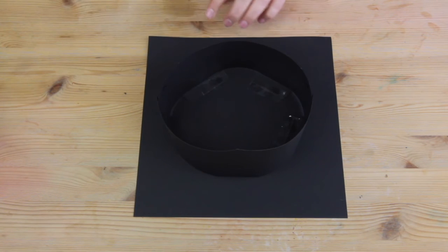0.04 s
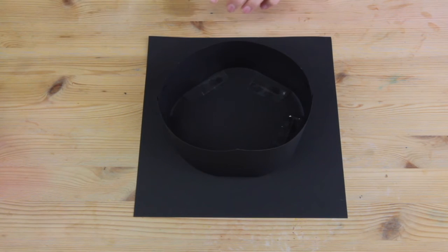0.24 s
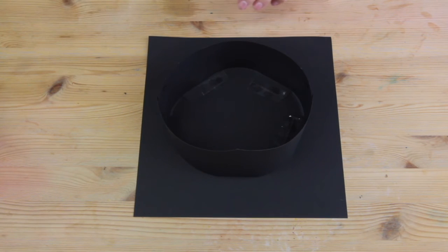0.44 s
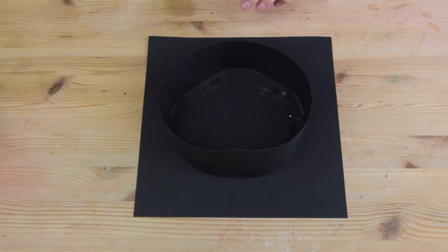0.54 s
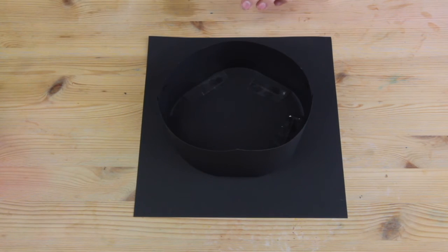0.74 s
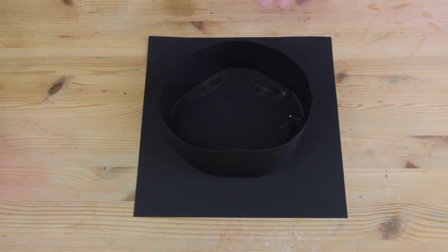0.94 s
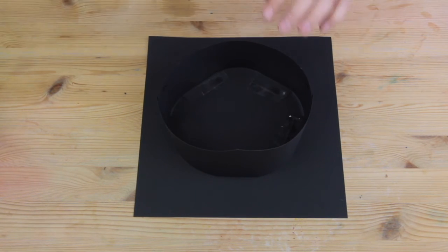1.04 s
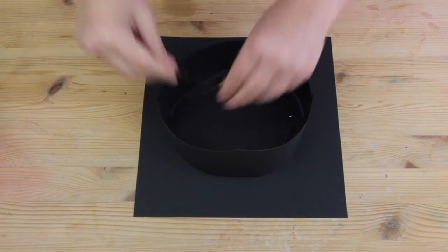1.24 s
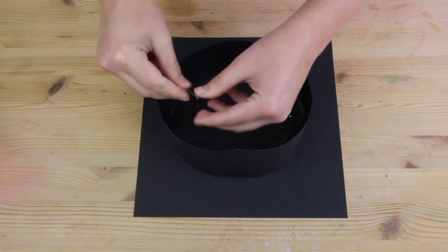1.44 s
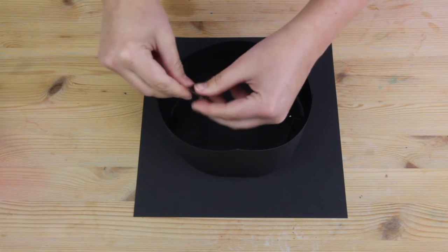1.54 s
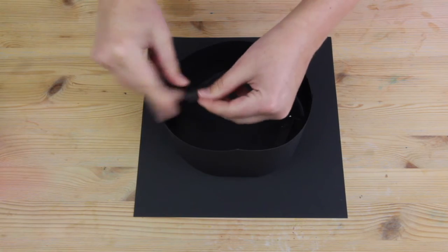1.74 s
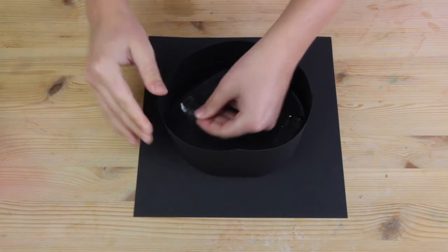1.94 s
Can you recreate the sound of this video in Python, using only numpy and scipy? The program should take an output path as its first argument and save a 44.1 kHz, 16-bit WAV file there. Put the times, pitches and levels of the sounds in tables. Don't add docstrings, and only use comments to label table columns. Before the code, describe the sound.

A quick crackly tearing of adhesive tape, two snaps, a faint rustle and a short pressing rasp

```python
import sys
import numpy as np
from scipy import signal
from scipy.fft import rfft, irfft, next_fast_len
from scipy.io import wavfile
from scipy.ndimage import map_coordinates

SR = 44100
rng = np.random.default_rng(int(sys.argv[2]) if len(sys.argv) > 2 else 0)


def boost_factor(decibels):
    exponent = np.asarray(decibels, float) / 20
    return 10 ** exponent


def unload_wav(signal):
    wavfile.write(
        sys.argv[1],
        SR,
        np.round(np.clip(np.atleast_2d(signal).T, -1, 1) * 32767).astype(np.int16),
    )


N = 88200

# start in seconds, level in dB, body knock over film crack in dB.
PEEL_START = [(0.2213, -16, -18), (0.2248, -28, -17), (0.2367, -14, -12), (0.2402, -26, -6),
              (0.2419, -11, -5), (0.2507, -23, -1), (0.2562, -18, -10), (0.2591, -18, -5),
              (0.2708, -29, -8), (0.3259, -13, -13), (0.3302, -17, -11), (0.3457, -15, -6),
              (0.349, -16, -6), (0.353, -15, -3), (0.3578, -17, -2), (0.3681, -17, -10), (0.376, -15, -2),
              (0.3805, -18, -12), (0.3844, -21, -4), (0.3946, -18, -8)]
PEEL_RUN = [(0.4085, -16, -4), (0.417, -17, -6), (0.4197, -19, -3), (0.4258, -18, -9), (0.4285, -19, -6),
            (0.4341, -18, -7), (0.4383, -20, -5), (0.4427, -21, -3), (0.447, -21, -5), (0.4534, -20, -2),
            (0.4599, -20, -4), (0.467, -17, -5), (0.4712, -19, -3), (0.4874, -15, -3), (0.4969, -21, -2),
            (0.4997, -22, -4), (0.5042, -29, -2)]
SNAP_AND_PRESS = [(0.5921, -11, 1), (0.5946, -15, -2), (0.6094, -14, 0), (0.6153, -15, 1), (0.6227, -26, 2),
                  (0.6616, -35, 6), (0.6968, -33, -9), (0.7046, -24, 0), (0.7062, -11, 10),
                  (0.7105, -25, 6), (1.6594, -41, -12), (1.6821, -35, -12), (1.6899, -22, -4),
                  (1.6905, -15, -4), (1.7022, -30, 4), (1.7128, -28, -4), (1.716, -28, -6),
                  (1.7198, -29, 0), (1.7357, -32, -5)]
LAST_CRACK = [
    (1.7279, -15.5, -10),
]
FINGER_TICKS = [(0.0161, -46.5, 10), (0.1262, -45.5, -6), (0.1592, -52, -3), (0.1812, -61, 0),
                (0.2119, -51, -10.5), (0.9639, -48, -17), (0.9943, -51, -5), (1.0161, -68, 21),
                (1.0579, -52.5, 3), (1.2112, -49, -28), (1.2317, -46.5, -30), (1.2576, -50, -29),
                (1.2683, -52, -24), (1.2872, -64, -17), (1.3155, -54, -19)]
TABLE_TICKS = [
    (.1262, -49.5, 15),
    (.131, -53, 20),
    (1.0155, -51, 23),
]

# pitch in Hz, width in Hz, level in dB.
ROLL_EDGE_RING = [(850, 300, -9), (2000, 450, 0), (3000, 1500, -1), (4250, 1300, 1), (6000, 1500, -3)]
ROLL_RING = [(900, 400, -16.5), (1990, 340, 4), (2750, 800, -3), (5000, 700, 1), (6100, 900, -1)]
ROLL_LATE_RING = [(1340, 130, 1), (2650, 820, 2.5), (4000, 1400, -4.5), (6500, 1100, 0.5)]
TAUT_FIRST_RING = [(1100, 600, -10), (2850, 600, 6), (4250, 600, -8), (6200, 800, -4)]
TAUT_RING = [(1000, 590, -14), (2650, 700, 6), (4200, 700, -9)]
SECOND_SNAP_RING = [(1300, 1260, -21), (2650, 810, 2.5), (3990, 520, 2), (5000, 1100, -9)]
CARD_RING = [(750, 500, -11), (1400, 800, -6), (2500, 1100, 3), (4450, 2200, -3)]
FINGER_RING = [(2140, 2800, 11), (4380, 5300, -3.5)]
TABLE_RING = [(1950, 300, -1), (2550, 400, 0), (800, 500, -10)]
SCUFF_RING = [(1950, 400, -2), (2430, 300, 1), (4360, 3700, -9)]

# frequency in Hz, level in dB.
FILM_COLOUR = [(1500, -6.5), (4000, 0), (6500, -1.5), (10000, -1.5), (13000, -2.5), (16500, -1)]
# time in seconds, pitch in Hz.
STRIP_PITCH = [(.22, 870), (.27, 850), (.32, 720), (.375, 700), (.39, 500), (.5, 460)]

# time in seconds, level in dB.
PEEL_CRACKLE = [(.225, -69.5), (.245, -34), (.28, -43.5), (.335, -61), (.35, -30), (.41, -30.5),
                (.472, -23.5), (.482, -40), (.53, -60)]
PRESS_CRACKLE = [(1.655, -79), (1.68, -37), (1.692, -29.5), (1.706, -27), (1.711, -40), (1.714, -26),
                 (1.737, -29), (1.75, -45.5), (1.83, -83)]

# time in seconds, level in dB.
CARRY = [(.95, -73), (1.0, -62), (1.06, -58.5), (1.14, -51), (1.21, -50.5), (1.25, -63), (1.32, -72),
         (1.35, -78)]
FIDGET = [(0, -75), (.13, -59), (.17, -78), (.21, -50.5), (.23, -86)]
DRAG = [
    (1.15, -58),
    (1.21, -54),
    (1.32, -57.5),
    (1.34, -80),
]
SCUFF = [(1.012, -80), (1.016, -56), (1.04, -62), (1.1, -64), (1.14, -60), (1.16, -65), (1.2, -85),
         (1.945, -85), (1.956, -60), (2, -65)]
# frequency in Hz, level in dB.
CARRY_COLOUR = [(5000, -36), (7500, -17), (9500, -7.5), (12000, -10), (14500, -7.5), (15800, -12)]
DRAG_COLOUR = [(3000, -25), (5000, -16.5), (12000, -16)]

# start in seconds, pitch in Hz, level in dB, rise in seconds.
THUDS = [(.603, 134, -42.5, 0.024), (0.656, 125, -48.5, 0.033), (0.714, 137, -47, 0.021),
         (.752, 126.5, -38, 0.024), (0.809, 130, -48.5, 0.027), (0.764, 210, -53, .012),
         (1.012, 275, -50, 0.0088)]

# time in seconds, gain in dB.
GAIN = [(0, 2), (.21, 2), (.26, -2.5), (.55, -6.5), (.9, -9.5), (1.05, -4), (1.3, -1), (1.5, 2), (2, 1)]
# frequency in Hz, level in dB.
HUM_COLOUR = [(12, -41), (20, -13.5), (49, -10), (81, -3.5), (161, -1.5), (232, -4.5), (304, -14),
              (367, -14.5), (500, -18), (650, -42), (1100, -120)]
HISS_COLOUR = [(290, -32.5), (500, -18.5), (579, -3.5), (1790, -10.5), (3250, -14), (6860, -18),
               (15300, -23), (16500, -37.5)]

# frequency in Hz, time to fall by 60 dB in seconds.
ROOM_T60 = [(300, 0.14), (1000, 0.75), (2500, 0.4), (4000, 0.52), (6000, 0.45), (12000, 0.3), (16000, 0.31)]
# frequency in Hz, level in dB.
OFF_AXIS = [(2800, 0), (4000, -3.5), (5500, 0)]
# frequency in Hz, level in dB.
MIC = [(15800, 0.5), (15950, -20.5), (16500, -29), (17100, -63.5)]

FILM_T60, BODY_T60, AFTER_T60, AFTER_DB = 0.0068, 0.014, 0.046, -18
SPIKE, BLOW = 1.9, 5
SLIP_DB, BODY_DB = 0.78, -2.23
STRIP_DB, STRIP_WIDTH_HZ = -20, 60
EDGE_LIFTED_S, FIRST_SNAP_S, SECOND_SNAP_S, PRESS_FROM_S = 0.3, 0.6, 0.68, 1
HUM_DB, HISS_DB = -54, -59.5
ROOM_DB, ROOM_DELAY_S, NEAR_DB, NEAR_T60 = -12.5, 0.014, -9.5, 0.14
AIMED_DB = -7
LOW_CUT_HZ = 325
CEILING = 0.93


def unit(x):
    return x / np.sqrt(np.mean(x ** 2) + 1e-20)


def along(points, hz):
    f, v = np.transpose(points)
    return np.interp(np.log(hz + 1), np.log(f + 1), v)


def level(rows):
    s, db = np.transpose(rows)
    return boost_factor(np.interp(np.arange(N) / SR, s, db, -150, -150))


def filtered(x, response):
    m = next_fast_len(x.shape[-1] + 8192)
    spectrum = rfft(x, m) * response(np.fft.rfftfreq(m, 1 / SR))
    return irfft(spectrum, m)[..., :x.shape[-1]]


def coloured(points):
    return lambda hz: boost_factor(along(points, hz))


def ringing(peaks, order=1):
    def response(f):
        total = 0
        for k, (centre, width, db) in enumerate(peaks):
            peak = 1j * f * width / (centre * centre - f * f + 1j * f * width)
            total = total + (-1) ** k * boost_factor(db) * peak ** order
        return total
    return response


def grit(spike_db):
    clumps = np.repeat(np.clip(rng.standard_normal(N // 12 + 1), -2, 2), 12)[:N]
    return unit(rng.standard_normal(N) * boost_factor(spike_db * clumps))


def slips(rows, body, film_hz, long=1, drum_db=-60, scatter=0, rise_s=1e-5):
    out = np.zeros(N + SR)
    t = np.arange(4096) / SR
    head = 110

    def decay(t60):
        return boost_factor(-60 * t / (t60 * long)) + boost_factor(AFTER_DB - 60 * t / AFTER_T60)

    for s, db, body_db in rows:
        noise = np.tanh(rng.standard_normal((2, len(t))))
        tint = rng.standard_normal(4)
        side = np.sign(tint[3])
        noise[0, :2] = SPIKE * np.array([1, -1]) / long
        noise[1, 0] = BLOW * side

        rise = 1 - np.exp(-(t + 1 / SR) / rise_s)
        peak = ringing([(film_hz * np.exp(0.096 * tint[0]), 2600, 5)])
        film = filtered(noise[0] * rise * decay(FILM_T60), lambda f: coloured(FILM_COLOUR)(f) * (1 + peak(f)))

        detune = np.exp(scatter * tint[1])
        knock = filtered(noise[1] * decay(BODY_T60), lambda f: ringing(body, order=2)(f * detune))
        both = film / np.std(film[:head]) + boost_factor(body_db + BODY_DB) * knock / np.std(knock[:head])

        strip_hz = np.interp(s, *np.transpose(STRIP_PITCH)) * np.exp(scatter * tint[2])
        drum = side * np.sin(2 * np.pi * strip_hz * t) * np.exp(-np.pi * STRIP_WIDTH_HZ * t)
        slip = both / np.std(both[:head]) + boost_factor(drum_db) * drum
        out[round(s * SR):][:len(t)] += boost_factor(db + SLIP_DB) * slip
    return out[:N]


def crackle(rows, body, body_db, spike_db):
    push = grit(spike_db) * level(rows)
    body_ring = ringing(body, order=2)
    return filtered(push, lambda f: 1.1 * (coloured(FILM_COLOUR)(f) + boost_factor(body_db) * body_ring(f)))


def peeling():
    edge = [r for r in PEEL_START if r[0] < EDGE_LIFTED_S]
    lifted = [r for r in PEEL_START if r[0] >= EDGE_LIFTED_S]
    start = slips(edge, ROLL_EDGE_RING, film_hz=9780, drum_db=STRIP_DB, scatter=0.039)
    start += slips(lifted, ROLL_RING, film_hz=9780, drum_db=STRIP_DB, scatter=0.039)
    run = slips(PEEL_RUN, ROLL_LATE_RING, film_hz=10800, drum_db=STRIP_DB, scatter=0.077)
    return start + run + crackle(PEEL_CRACKLE, ROLL_LATE_RING, 0.1, spike_db=3.5)


def between(a, b):
    return [r for r in SNAP_AND_PRESS if a < r[0] < b]


def snapping():
    first = slips(between(0, FIRST_SNAP_S), TAUT_FIRST_RING,
                  film_hz=9900, long=1.7, drum_db=-34.5, rise_s=0.001)
    rest_of_first = slips(between(FIRST_SNAP_S, SECOND_SNAP_S), TAUT_RING,
                   film_hz=11200, long=1.4, drum_db=-18.5, rise_s=0.00042)
    second_snap = slips(between(SECOND_SNAP_S, PRESS_FROM_S), SECOND_SNAP_RING,
                  film_hz=10650, long=0.44, rise_s=0.00066)
    return first + rest_of_first + second_snap


def pressing():
    press = slips(between(PRESS_FROM_S, 9), CARD_RING, film_hz=14400, long=0.62, rise_s=0.0002)
    last = slips(LAST_CRACK, CARD_RING, film_hz=13500, long=0.83)
    return press + last + crackle(PRESS_CRACKLE, CARD_RING, 1.0, spike_db=4.5)


def ticks():
    fingers = slips(FINGER_TICKS, FINGER_RING, film_hz=12000, long=2.5)
    return fingers + slips(TABLE_TICKS, TABLE_RING, film_hz=9000, long=1.5)


def rub(response):
    return unit(filtered(grit(spike_db=5.5), response))


def rustle():
    whisper = rub(coloured(CARRY_COLOUR)) * (level(CARRY) + level(FIDGET))
    drag = rub(coloured(DRAG_COLOUR)) * level(DRAG)
    scuff = rub(ringing(SCUFF_RING, order=2)) * level(SCUFF)
    return whisper + drag + scuff


def thuds():
    t = np.maximum(np.arange(N) / SR - np.array(THUDS)[:, :1], 0)
    _, hz, db, rise = np.transpose(THUDS)[..., None]
    swell = (t / rise * np.exp(1 - t / rise)) ** 3
    return (boost_factor(db) * swell * np.sin(2 * np.pi * hz * t)).sum(0)


def room(x):
    out, step, length = np.zeros(N + SR), SR // 10, SR // 2
    age = np.arange(length) / SR
    for i in range(0, N, step):
        hz, t, z = signal.stft(rng.standard_normal((2, length)), SR, nperseg=256)
        fading = z[0] * boost_factor(-60 * t / along(ROOM_T60, hz)[:, None])
        far = signal.istft(fading, SR, nperseg=256)[1][:length]
        far = far * (1 - np.exp(-age / ROOM_DELAY_S))
        near = rng.standard_normal(length) * boost_factor(-60 * age / NEAR_T60)
        tail = boost_factor(ROOM_DB) * far / np.linalg.norm(far) + boost_factor(NEAR_DB) * near / np.linalg.norm(near)
        wet = signal.fftconvolve(x[i:i + step], tail)
        out[i:i + len(wet)] += wet
    return out[:N]


def background():
    lumps = boost_factor(0.77 * map_coordinates(rng.standard_normal(60), [np.arange(N) * 25 / SR]))
    hum = unit(lumps * filtered(rng.standard_normal(N), coloured(HUM_COLOUR)))
    hiss = unit(filtered(rng.standard_normal(N), coloured(HISS_COLOUR)))
    return level(GAIN) * (boost_factor(HUM_DB) * hum + boost_factor(HISS_DB) * hiss)


def scene():
    hands = peeling() + snapping() + pressing() + ticks() + rustle()
    near = filtered(hands, lambda f: (1j * f / (LOW_CUT_HZ + 1j * f)) ** 4)
    t = np.arange(N) / SR
    aimed = (t > SECOND_SNAP_S) & (t < PRESS_FROM_S)
    send = boost_factor(np.where(aimed, AIMED_DB, 0))
    echo = room(filtered(near * send, coloured(OFF_AXIS)))
    return (near + echo + thuds() + background())[None]


def band_limit(x):
    return signal.sosfilt(signal.butter(12, 17120, fs=SR, output="sos"), x)


def record(dry):
    soft = dry / (1 + np.abs(dry / CEILING) ** 8) ** (1 / 8)
    return band_limit(filtered(soft, coloured(MIC)))


dry = scene()
out = record(dry)
unload_wav(out)
```